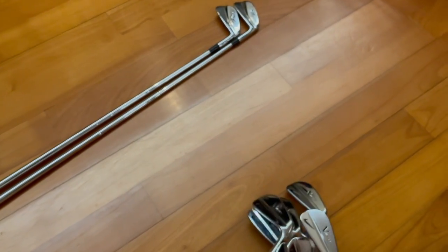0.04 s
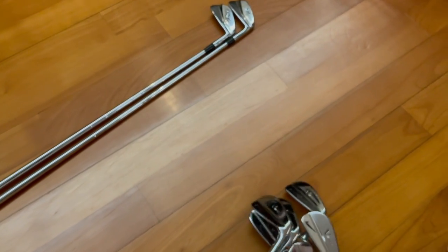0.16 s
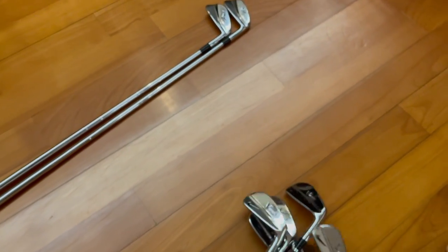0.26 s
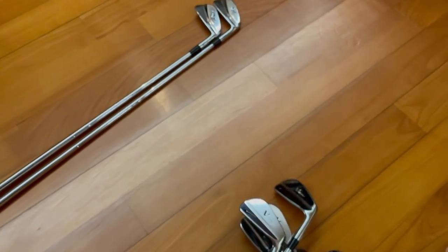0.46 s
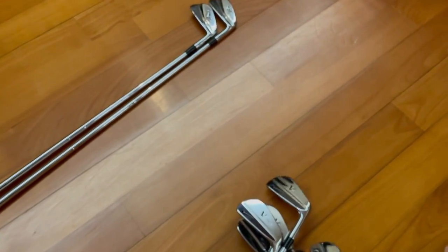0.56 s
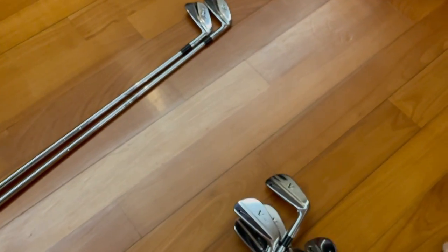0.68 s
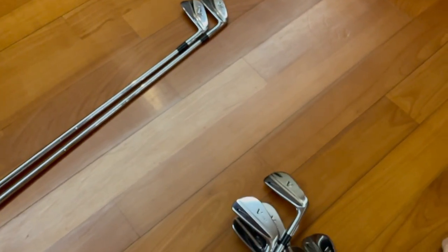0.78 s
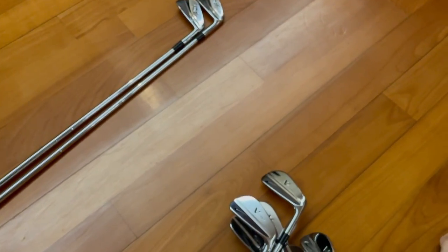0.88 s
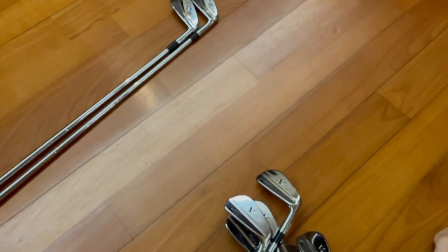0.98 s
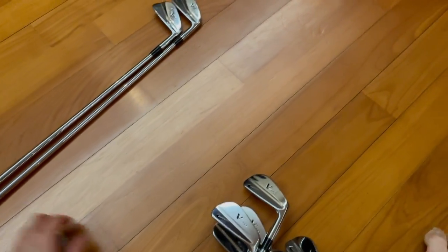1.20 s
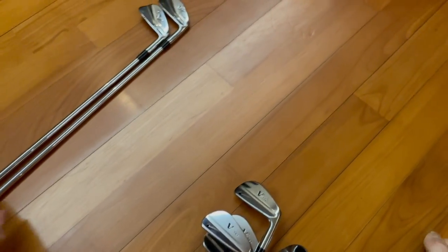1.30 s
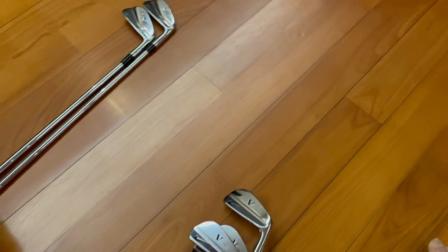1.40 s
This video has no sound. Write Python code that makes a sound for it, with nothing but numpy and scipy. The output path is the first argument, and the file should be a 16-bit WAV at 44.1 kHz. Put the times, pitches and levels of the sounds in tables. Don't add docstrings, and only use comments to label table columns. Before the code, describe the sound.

Golf clubs clatter on a wooden floor in a bare room: a fading earlier ring, a dense burst of bright clacks and woody knocks, then soft low puffs on the handheld microphone and small close ticks.

```python
import sys
import numpy as np
from scipy import signal
from scipy.fft import rfft, irfft, next_fast_len
from scipy.io import wavfile

SR = 44100
rng = np.random.default_rng(int(sys.argv[2]) if len(sys.argv) > 2 else 0)


def decibels_to_gain(level_db):
    exponent = np.asarray(level_db, float) / 20
    return 10 ** exponent


def dump_mix(stems):
    frames = np.atleast_2d(stems).T
    limited = np.clip(frames, -1, 1)
    pcm = np.round(limited * 32767).astype(np.int16)
    wavfile.write(sys.argv[1], SR, pcm)


N = 63945

# [f/Hz, likeness/0-1]
LIKENESS = [(60, .9), (300, .85), (700, .3), (2500, .55), (6000, .8), (8500, .97), (13000, .9)]


def rms_one(x):
    return x / np.sqrt(np.mean(x ** 2) + 1e-20)


def in_time(rows):
    return np.interp(np.arange(N) / SR, *np.transpose(rows))


def at_hz(points, hz):
    table_hz, value = np.array(points).T
    return np.interp(np.log(hz + 1), np.log(table_hz), value)


def paired(two, likeness):
    likeness = np.clip(likeness, 0, 1)
    common = np.sqrt(.5 + .5 * likeness) * two[0]
    return common + np.sqrt(.5 - .5 * likeness) * two[1] * [[1], [-1]]


def coloured(spectrum, likeness=None):
    hz = np.fft.rfftfreq(N, 1 / SR)
    if likeness is None:
        likeness = at_hz(LIKENESS, hz)
    two = rfft(rng.standard_normal((2, N))) * decibels_to_gain(at_hz(spectrum, hz))
    return rms_one(irfft(paired(two, likeness), N))


def room_tone():
    # [f/Hz, level/dB per Hz]
    tone_colour = [(18, -41.5), (48, -0.5), (355, -4.5), (512, -11), (1100, -11), (6900, -19.5),
                   (8520, -10), (13700, -20), (16000, -21.5)]
    # [t/s, level/dB]
    recovery = [
        (0, -22),
        (.5, -1),
        (.8, -19),
        (1.0, -8),
        (1.2, -4),
        (1.45, -8.5),
    ]
    tone_db = -50.5
    return decibels_to_gain(tone_db + in_time(recovery)) * coloured(tone_colour)


def earlier_clatter():
    # [f/Hz, level/dB per Hz]
    earlier_colour = [(35, -35), (70, -8), (354, -2), (749, -19), (5090, -23), (7230, -28.5), (8710, -39.5),
                      (13600, -36), (16000, -49.5)]
    level_db, t60_s = -32, 0.43
    return decibels_to_gain(level_db - 60 * np.arange(N) / SR / t60_s) * coloured(earlier_colour)


def handling_rumble():
    # [t/s, level/dB]
    buffet = [(0, -61), (.15, -53.5), (.3, -43.5), (.45, -50), (.53, -45.5), (.64, -48.5), (.8, -37),
              (.92, -45.5), (1.05, -40.5), (1.13, -46.5), (1.24, -56), (1.28, -82.5), (1.45, -62.5)]
    # [f/Hz, level/dB per Hz]
    air_colour = [(12, -48), (20, -35.5), (43, -14), (81, -12.5), (139, -14), (215, -20.5), (255, -25.5),
                  (600, -43.5), (780, -63), (1320, -120)]
    # [centre t/s, peak level/dB, pitch f/Hz]
    bump_table = [(0.671, -42.5, 70), (0.72, -25, 110.2), (0.759, -25, 70), (0.7932, -24.5, 115),
                  (.84, -27, 70), (0.884, -37, 80), (0.933, -33, 110), (0.953, -28.5, 82.8),
                  (0.984, -33.5, 127), (0.998, -31, 70), (1.042, -32.5, 69.3), (1.075, -40.5, 90.4),
                  (1.151, -42.5, 75.6), (1.183, -44, 79), (1.222, -30.5, 75.3)]
    lump_db, lumps_per_s, rumble_likeness = 6.5, 17, .9
    half_width_cycles, sag_per_cycle = .62, .15

    r = np.exp(-2 * np.pi * lumps_per_s / SR)
    lumps = rms_one(signal.lfilter([1], [1, -2 * r, r * r], rng.standard_normal(N)))
    rumble = decibels_to_gain(in_time(buffet) + lump_db * lumps) * coloured(air_colour, rumble_likeness)

    s, db, hz = np.transpose(bump_table)[:, :, None]
    cycles = (np.arange(N) / SR - s) * hz
    swing = np.sin(2 * np.pi * (cycles - .5 * sag_per_cycle * cycles ** 2 + .5))
    swell = np.exp(-.5 * (cycles / half_width_cycles) ** 2)
    return rumble + np.sum(decibels_to_gain(db) * swell * swing, axis=0)


def room(x):
    # [f/Hz, t60/s]
    reverb = [(100, 0.94), (400, 0.77), (1500, 0.57), (5000, 0.47), (12000, 0.23)]
    # [delay t/s, level/dB]
    echoes = [
        (.0021, -16.5),
        (.0033, -12),
        (.0087, -11.5),
        (0.0131, -26),
    ]
    tail_db, build_s = -8, 0.004
    bass_hz = 445
    size = next_fast_len(2 * N)
    hz, t = np.fft.rfftfreq(size, 1 / SR), np.arange(N) / SR

    noise = rng.standard_normal((2, N)) * (1 - np.exp(-t / build_s)) / 40
    tail = 0
    for k, (_, t60_s) in enumerate(reverb):
        band = [(row[0], float(j == k)) for j, row in enumerate(reverb)]
        dying = noise * decibels_to_gain(-60 * t / max(t60_s, .05))
        tail = tail + at_hz(band, hz) * rfft(dying, size)
    late = decibels_to_gain(tail_db) * hz / np.hypot(hz, bass_hz) * paired(tail, at_hz(LIKENESS, hz))

    early = np.array([sum(decibels_to_gain(db) * np.exp(-2j * np.pi * hz * s) for s, db in echoes[side::2])
                      for side in (0, 1)])
    return irfft(rfft(x, size) * (early + late), size)[:, :N]


def shafts():
    # [t/s, peak level/dB, pitch f/Hz, t60/s]
    shaft_rings = [(0.2030, -40, 5280, .008), (0.3245, -17, 1280, 0.0074), (0.3478, -15, 4090, 0.0098),
                   (0.3840, -15, 3700, 0.013), (0.7318, -31, 2085, 0.017), (0.7322, -27, 3620, .012),
                   (0.7615, -34.5, 1350, .025), (0.9518, -45, 1910, 0.05), (0.9530, -49.5, 1410, 0.047),
                   (0.9515, -48.5, 3600, 0.009), (1.0800, -49.5, 2270, 0.047), (1.0880, -43, 2700, 0.016),
                   (1.0882, -52, 4590, 0.0098), (1.0890, -39, 262, 0.05)]
    s, db, hz, t60_s = np.transpose(shaft_rings)[:, :, None]
    t = np.maximum(np.arange(N) / SR - s, 0)
    decay_db = -60 * np.minimum(t / np.maximum(t60_s, .002), 3)
    tones = decibels_to_gain(db + decay_db) * np.sin(2 * np.pi * hz * t) * (t < 3 * t60_s)
    return np.sum(tones, axis=0)


def struck(hits, modes, contact_s, rough, size=N):
    strike_spread_db, place_spread_db, place_spread_s = 1.5, 2.0, .000025
    s, db, tilt_db = np.transpose(hits)[:3]
    t = np.arange(256) / SR
    draws = rng.standard_normal((len(s), len(t) + len(modes) + 2))

    contact = draws[:, :len(t)] * np.exp(-t / max(contact_s, 1e-4))
    contact[:, 0] = np.sqrt(np.sum(contact ** 2, axis=1)) / rough ** .5
    contact /= np.sqrt(np.sum(contact ** 2, axis=1))[:, None]

    sides = np.array([[.5], [-.5]])
    pan = decibels_to_gain(sides * place_spread_db * draws[:, -1])
    arrival_s = s + sides * place_spread_s * draws[:, -2]
    where = np.round(arrival_s * SR).astype(int)[..., None] + np.arange(len(t))

    centre_hz = np.exp(np.mean(np.log([m[0] for m in modes])))
    out = 0
    for k, (hz, level_db, t60_s) in enumerate(modes):
        octaves = np.clip(np.log2(hz / centre_hz), -2, 1)
        strike_db = strike_spread_db * draws[:, len(t) + k]
        gain = decibels_to_gain(db + level_db + tilt_db * octaves + strike_db)
        force = []
        for at, side_gain in zip(where, pan):
            push = contact * (gain * side_gain)[:, None]
            force.append(np.bincount(at.ravel(), push.ravel(), size + 2 * len(t))[:size])
        r, w = decibels_to_gain(-60 / (max(t60_s, .001) * SR)), 2 * np.pi * hz / SR
        resonator = [1, -2 * r * np.cos(w), r * r]
        out = out + (-1) ** k * signal.lfilter([.5, 0, -.5], resonator, np.array(force) + 1e-18)
    return out


def own_rings(hits, level_db, t60_s, contact_s, rough):
    lead, size = 16, 4096
    out = np.zeros((2, N + size))
    for s, db, _, hz in hits:
        start = int(s * SR) - lead
        ring = struck([(lead / SR, db, 0)], [(hz, level_db, t60_s)], contact_s, rough, size=size)
        out[:, start:start + size] += ring
    return out[:, :N]


def rattle(modes, contact_s, rough):
    # [t/s, level/dB]
    vigour = [
        (0.19, -41.5),
        (0.234, -27),
        (0.264, -29.5),
        (0.274, -16),
        (0.308, -19.5),
        (0.354, -14),
        (0.462, -53),
        (0.582, -30.5),
        (0.68, -65),
    ]
    touches_per_s, size_db = 1500, 3.5
    first, last = vigour[0][0], vigour[-1][0]
    draws = rng.random((1000, 2))
    s = first + np.cumsum(-np.log(draws[:, 0])) / touches_per_s
    db = np.interp(s, *np.transpose(vigour)) - size_db * np.log(draws[:, 1])
    db = db - 200 * (s > last)
    return struck(np.c_[np.minimum(s, last), db, 0 * s], modes, contact_s, rough)


def clubs():
    # [t/s, peak level/dB, tilt/dB per octave, own ring f/Hz]
    clack_hits = [(0.0014, -25, -4, 2850), (0.171, -33.5, -4.5, 4640), (0.2032, -33, 2, 5200),
                  (0.2348, -27.5, 1.5, 4450), (0.2415, -30.5, 4, 2500), (0.2485, -24.5, 6.5, 3660),
                  (0.2512, -15, 6, 4560), (0.2558, -24, 5.5, 3200), (0.2731, -1.5, 9, 4460),
                  (0.2788, -2, 2.5, 3930), (0.2808, -3.5, 7, 6830), (0.2852, -15.5, 4, 4000),
                  (0.2916, -15, -1, 4300), (0.2972, -18, 2.5, 6300), (0.3027, -4.5, 2, 4070),
                  (0.3102, -16.5, 13, 4800), (0.3186, -9.5, 7, 3600), (0.3278, -8, 6.5, 4150),
                  (0.3338, -14, 2, 4500), (0.3408, -14.5, 8, 7300), (0.3475, -11, 7.5, 3830),
                  (0.3575, -17.5, 3, 3500), (0.3660, -1.5, 11.5, 4930), (0.3682, -7.5, 17, 7130),
                  (0.3755, -19.5, 1, 3600), (0.3840, -21.5, 2.5, 3740), (0.5635, -23.5, 12.5, 6700),
                  (0.5713, -22.5, -4.5, 1600), (0.7318, -26.5, -3, 3450), (0.7372, -35, -2.5, 2920),
                  (0.7612, -32.5, -7, 3300), (0.9505, -39.5, 1.5, 3700), (0.962, -51, -0.5, 4300),
                  (1.0105, -46, -2, 3500), (1.029, -50.5, 2.5, 3000), (1.081, -43.5, 6.5, 2250),
                  (1.0878, -30, 4.5, 4490), (1.2724, -47.5, -8, 2500)]
    # [t/s, peak level/dB, tilt/dB per
    # octave, own ring f/Hz]
    knock_hits = [(0.007, -24, 10, 490), (0.029, -27.5, -9, 557), (0.175, -23.5, -7, 517),
                  (0.219, -27, -8, 345), (0.2298, -4, -6, 1125), (0.2325, -7.5, -3.5, 433),
                  (0.2413, -4, -4.5, 420), (0.2497, -9.5, -12, 1160), (0.2732, -5, 0, 1600),
                  (0.2888, -12.5, 20, 348), (0.305, -5.5, -3.5, 330), (0.3243, -3.5, 3, 1300),
                  (0.3298, 0.5, 3, 1500), (0.3335, -2.5, -11.5, 340), (0.3432, -4.5, 13, 1380),
                  (0.3572, 8, 1.5, 1000), (0.3612, -6, 0.5, 407), (0.3683, -6.5, 9, 1300),
                  (0.516, -18, -1, 300), (0.567, -27, 16, 1050), (0.612, -20, -6, 310),
                  (0.729, -15, -2.5, 400), (0.7612, -20, 6, 1292), (0.9515, -35.5, 12, 1945),
                  (0.964, -36, -3, 1100), (1.011, -53, 3, 1400), (1.031, -52, 10, 1100),
                  (1.053, -46.5, 11.5, 1500), (1.0885, -26, -1, 260), (1.175, -44, -6, 396),
                  (1.362, -40, 8.5, 1066), (1.409, -48.5, 5.5, 600), (1.442, -37.5, -8, 394)]
    # [f/Hz, level/dB, t60/s]
    head_modes = [(1570, 2, 0.005), (2100, -2.5, 0.002), (2700, 4, 0.0017), (3470, 7.5, 0.003),
                  (4500, 5, 0.0023), (5700, 6, 0.00052), (7170, -0.5, 0.0048), (8370, -5.5, 0.0027),
                  (9940, 0, 0.00046), (11290, 0, 0.0015), (14060, -4.5, 0.0018)]
    # [f/Hz, level/dB, t60/s]
    board_modes = [(115, -17, 0.027), (165, -9.5, 0.036), (255.5, -9.5, 0.045), (300, -5, 0.11),
                   (335, -3.5, 0.034), (408.3, -4, 0.043), (519, -0.5, 0.015), (607, 1.5, 0.0096),
                   (887, -9, .015), (1068, -6.5, 0.022), (1134, -7.5, 0.027), (1350, -0.5, 0.0036),
                   (1686, -9, 0.012), (1950, -6, 0.0034)]
    # [low f/Hz, high f/Hz]
    board_band_hz = [80, 2600]
    steel_touch, wood_touch = (0.0013, 2.5), (0.00091, .3)
    clack_db, steel_rattle_db, knock_db, wood_rattle_db = -9.5, -17, -14, -13

    clacks = struck(clack_hits, head_modes, *steel_touch)
    clacks = clacks + own_rings(clack_hits, 6.5, 0.006, *steel_touch)
    knocks = struck(knock_hits, board_modes, *wood_touch)
    knocks = knocks + own_rings(knock_hits, 6.5, 0.014, *wood_touch)
    steel = decibels_to_gain(clack_db) * clacks + decibels_to_gain(steel_rattle_db) * rattle(head_modes, *steel_touch)
    wood = decibels_to_gain(knock_db) * knocks + decibels_to_gain(wood_rattle_db) * rattle(board_modes, *wood_touch)
    board_band = signal.butter(3, board_band_hz, "band", fs=SR, output="sos")
    return steel + signal.sosfilt(board_band, wood)


def scene():
    close_from_s, close_room_db = .7, -2
    near = clubs() + shafts()
    stir = np.where(np.arange(N) < close_from_s * SR, 1, decibels_to_gain(close_room_db))
    reverberation = room(near.mean(axis=0) * stir)
    return near + reverberation + earlier_clatter() + room_tone() + handling_rumble()


def low_pass(x):
    return signal.sosfilt(signal.butter(12, 16640, fs=SR, output="sos"), x)


def record(dry):
    # [f/Hz, left minus right/dB]
    pair_db = [(60, 0), (290, 4), (640, 10), (1400, 6), (3100, 4.5), (6000, 2.2), (7900, 0), (15000, 0)]
    # [f/Hz, left lead/rad]
    pair_phase = [(100, 0), (430, .6), (750, -1.9), (1200, -.6), (3500, .9), (5600, -.9), (8000, -2.95),
                  (9500, -3.35), (13000, -6.28)]
    cancel_hz, cancel_width_hz, cancel_share = 8700, 850, .6
    side_cut_hz, cutoff_hz, ceiling = 12400, 16300, .95
    size = next_fast_len(N + 4096)
    hz = np.fft.rfftfreq(size, 1 / SR)
    half = decibels_to_gain(.5 * at_hz(pair_db, hz)) * np.exp(.5j * at_hz(pair_phase, hz))
    left, right = rfft(dry, size) * [half, 1 / half]
    side = .5 * (left - right) * (hz < side_cut_hz)
    notch = 1 - cancel_share * np.exp(-((hz - cancel_hz) / cancel_width_hz) ** 4)
    mid = .5 * (left + right) * notch
    x = irfft([mid + side, mid - side], size)[:, :N]
    x = ceiling * np.tanh(x / ceiling)
    x = signal.sosfilt(signal.cheby2(12, 60, cutoff_hz, fs=SR, output="sos"), x)
    return low_pass(x)


dry = scene()
out = record(dry)
dump_mix(out)
```